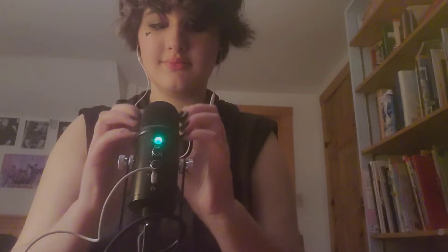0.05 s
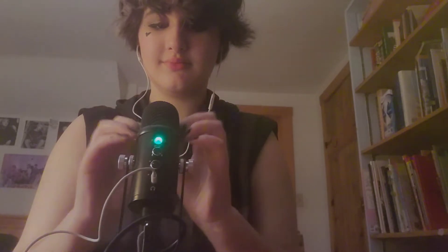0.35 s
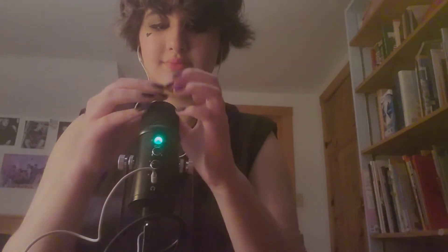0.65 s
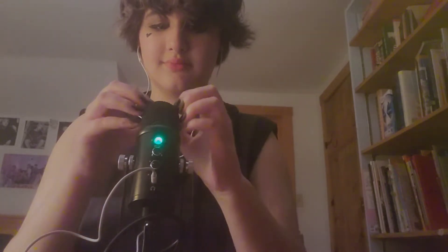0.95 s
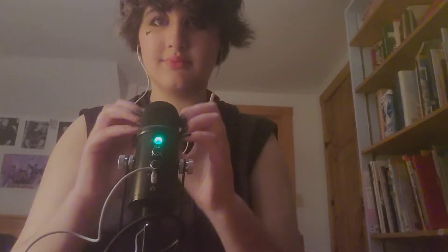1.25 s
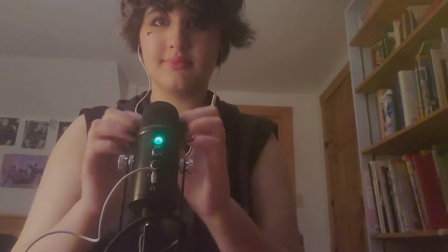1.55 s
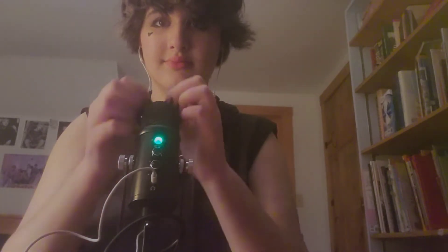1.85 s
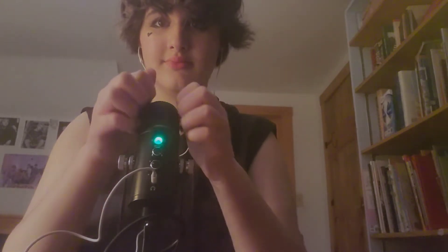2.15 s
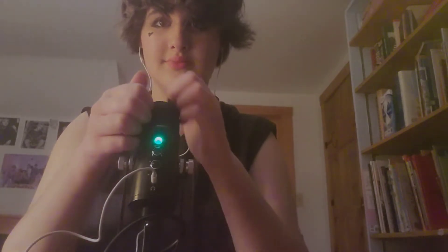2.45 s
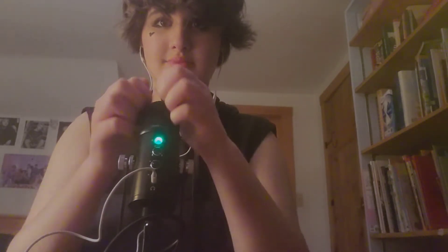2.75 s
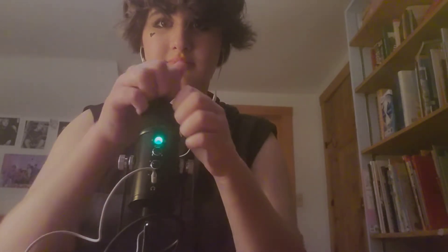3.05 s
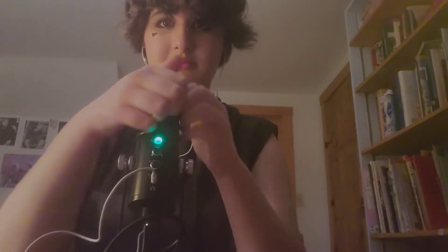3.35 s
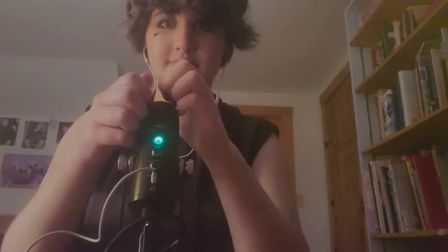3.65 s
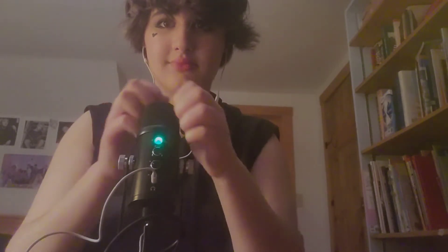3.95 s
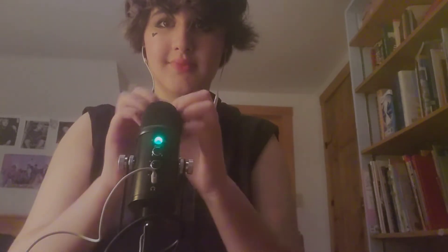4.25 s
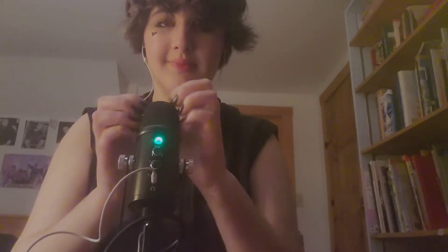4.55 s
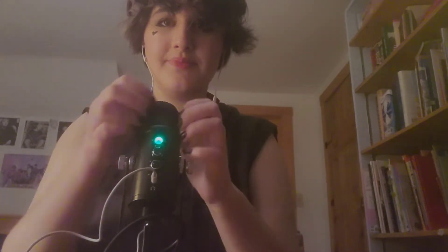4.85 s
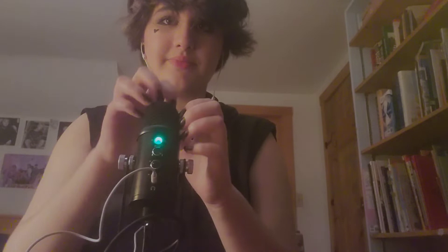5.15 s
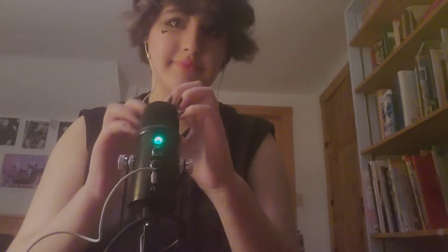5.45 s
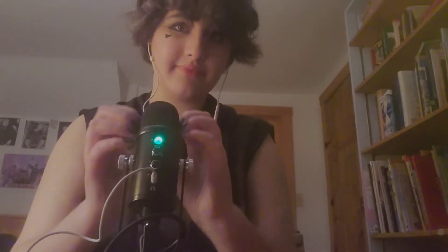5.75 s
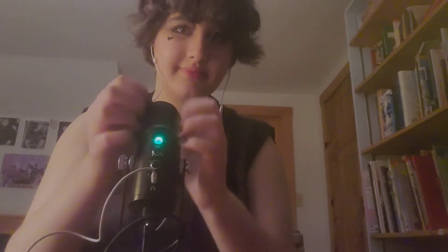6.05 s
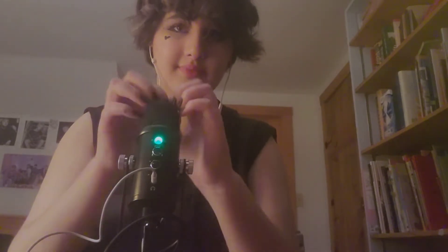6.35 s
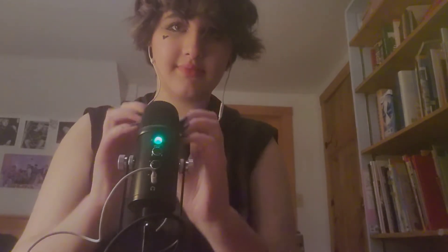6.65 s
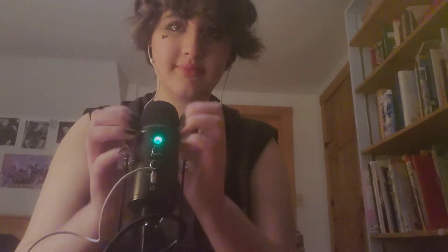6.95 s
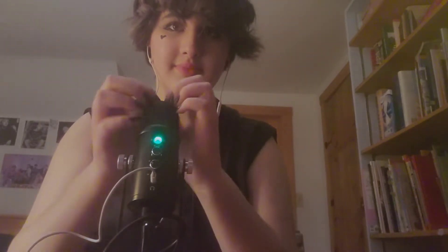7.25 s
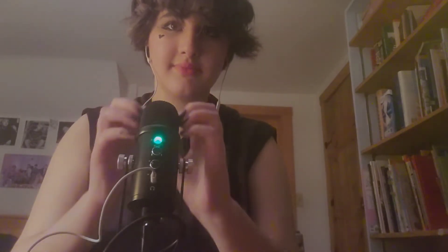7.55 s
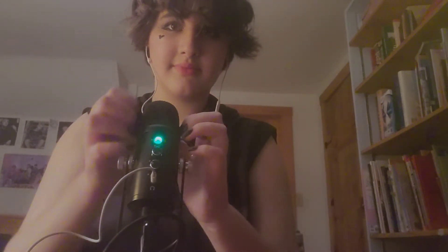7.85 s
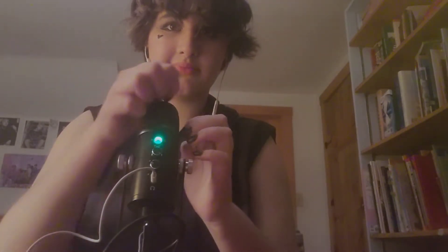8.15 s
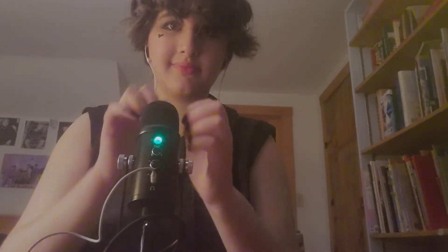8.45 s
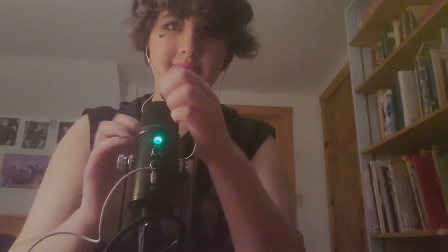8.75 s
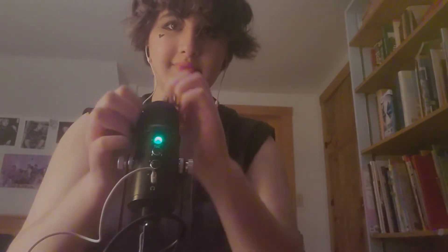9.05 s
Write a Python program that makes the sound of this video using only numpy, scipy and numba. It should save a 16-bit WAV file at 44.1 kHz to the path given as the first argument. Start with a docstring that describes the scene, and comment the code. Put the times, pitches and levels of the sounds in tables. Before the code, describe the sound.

Fingernails of two hands scratch and rub the foam cover of a microphone, right against the capsule. After one stroke and a brief pause, short uneven drags follow one another continuously, muffled and booming, with a fine crackle on top. Nails snag and spring free with bassy pops, fingertips thud on the cover, and small dry clacks come through from the grille. A very faint electronic hiss and whine lie underneath.

```python
"""Booming, crackling scratches: fingernails of two hands on the foam cover of a desk microphone.
Each nail sticks and slips over the pores; a slip shoves the microphone body, which booms, and
crackles through the grille. Single snags stand out, fingertips thud on the cover and nails clack
on the grille. The preamplifier faintly whines and hisses; a limiter holds the peaks."""
import sys
import numpy as np
from scipy import signal
from scipy.fft import rfft, irfft, next_fast_len
from scipy.io import wavfile
from scipy.ndimage import uniform_filter1d, minimum_filter1d
from numba import njit

SR = 44100
rng = np.random.default_rng(int(sys.argv[2]) if len(sys.argv) > 2 else 0)


def pcm_store(signal):
    """Save signal as 16-bit PCM."""
    levels = np.round(np.clip(np.atleast_2d(signal), -1, 1) * 32767)
    wavfile.write(sys.argv[1], SR, levels.astype(np.int16).T)


N = 410571
TIME = np.arange(N) / SR

# a nail snags and lets go: (time [s], spray [dB], shove on the body [dB])
SNAGS = [(0.0289, -10.5, 19), (0.0598, -26.5, 12), (0.0894, -30.5, 17), (0.1408, -33.5, 8),
         (0.2366, -21, 16), (0.2517, -23.5, 18), (0.3043, -28.5, 11), (0.8822, -39, 9), (1.0023, -47, 9.5),
         (1.041, -42, 3), (1.1361, -32, 18.5), (1.1595, -30.0, 20.5), (1.1806, -29.5, 18),
         (1.339, -26, 16.5), (1.3459, -16, 24.5), (1.6319, -33, 13.5), (2.6599, -31, 10),
         (2.7299, -46, 6.5), (3.04, -36, 5), (3.1149, -27, 18), (3.2582, -42, 10.5), (3.3487, -27.5, 10),
         (3.5886, -36, 21), (3.6221, -37, 16), (3.71, -27.5, 19.5), (3.7683, -44, 17), (4.0329, -44, 2),
         (4.338, -34.0, 9), (4.6178, -35, 7), (4.6892, -35, 9.5), (4.9625, -35.5, 0.5),
         (5.217, -33.5, 12.5), (5.3704, -22, 21.0), (5.3943, -17, 25), (5.4193, -23.5, 19.5),
         (5.5307, -31.5, 16), (5.5866, -26.5, 24), (5.6136, -32, 22.5), (5.7404, -25, 15.5),
         (5.7866, -24, 14), (5.8038, -35, 22), (5.9248, -19, 23), (5.9475, -18.5, 21), (6.1312, -34, 23),
         (6.19, -20.5, 22), (6.3623, -22, 23), (6.3871, -14.5, 23.5), (6.4491, -21.5, 14), (6.569, -27, 16),
         (6.7061, -25.5, 14), (6.737, -37, 22), (6.8696, -17, 27), (6.942, -42, 1), (6.9943, -29, 14.5),
         (7.1635, -31, 10), (7.219, -33.0, 21), (7.4036, -27.5, 13), (7.5159, -32.5, 18.0),
         (7.7467, -23.0, 19), (7.9241, -30.5, 13), (8.0232, -44, 14), (8.0463, -43.0, 14.0),
         (8.075, -32.5, 19.0), (8.1267, -32.5, 18), (8.195, -37, 15), (8.2254, -40, 15),
         (8.2391, -33.5, 17), (8.2896, -23.5, 21), (8.413, -32.5, 10), (8.844, -32, 9), (8.8802, -36, 15),
         (8.9161, -36.5, 15.0), (8.9492, -38, 15), (8.9712, -26, 25), (9.15, -28.5, 19.5),
         (9.2946, -39, 13.5)]
# what the foam passes of a soft press: (frequency [Hz], level [dB])
PRESS_EQ = [(15, -50.5), (27, -27), (38, -1.5), (70, -0.5), (140, -8), (220, -6), (400, -36), (1000, -71)]
# what it passes of a firm slip or a snag: (frequency [Hz], level [dB])
SNAP_EQ = [(30, -37), (80, -6), (130, 2), (280, 2.5), (450, -4), (520, 2.5), (620, -4), (720, -13.5),
           (830, -20.5), (1000, -38.5), (1400, -41), (3000, -63)]
# knock of a hard nail: (frequency [Hz], level [dB])
KNOCK_EQ = [(200, -23), (700, 13), (900, 8), (1150, 3.5), (1450, -9), (1900, -12.5), (4000, -16),
            (12000, -62)]
# resonances of microphone body and stand: (frequency [Hz], width [Hz], lift [dB])
BODY_MODES = [(40.7, 11, -6), (134.8, 16.2, 7), (172.4, 7, 2.5), (242.7, 28, -2), (331, 51, 8.5),
              (393.1, 29, 4.5), (571.6, 21.6, 7.5)]
# resonances of grille and capsule: (frequency [Hz], width [Hz], lift [dB])
GRILLE_MODES = [(1468, 30, 0.5), (1832, 59, 9), (2065, 176, 0), (2675, 170, 3.5), (3390, 76, 0.5),
                (3640, 99, -1), (4030, 390, -0.5), (4710, 140, -2.5), (5430, 80, -6), (5890, 185, 3.5),
                (6200, 110, -9.5), (6780, 130, -3), (7220, 190, -3.5), (8340, 41, -2), (9320, 146, 4.5),
                (12440, 230, 11), (13300, 170, 5), (14600, 120, 20)]


def undb(db):
    """Decibels to gain."""
    return np.exp(np.asarray(db) * np.log(10) / 20)


def response(eq, modes, size=16384):
    """Causal impulse response of unit energy: a broad EQ curve plus resonances."""
    hz = np.maximum(np.arange(size // 2 + 1) * SR / size, 1)
    eq_hz, eq_db = np.transpose(eq)
    cepstrum = irfft(np.log(undb(np.interp(np.log(hz), np.log(eq_hz), eq_db))))
    cepstrum[1:size // 2] *= 2  # fold to minimum phase
    cepstrum[size // 2 + 1:] = 0
    peaks = sum(undb(lift) / (1 + 1j * (hz - f * f / hz) / width) for f, width, lift in modes)
    ring = irfft(np.exp(rfft(cepstrum)) * (1 + peaks))
    return ring / np.linalg.norm(ring)


def through(x, ring):
    """Convolve with an impulse response."""
    return signal.oaconvolve(x, ring)[:N]


def pulses(times_s, sizes):
    """One impulse of each size at each time."""
    return np.bincount(np.clip(times_s * SR, 0, N).astype(int), sizes, N + 1)[:N]


def local_rms(x, span_s):
    """Running RMS over about span_s."""
    width = max(int(span_s * SR), 2)
    return np.sqrt(np.abs(uniform_filter1d(uniform_filter1d(x * x, width), width)) + 1e-12)


def driven(force, eq, modes, rms, span_s):
    """Resonator whose drive is scaled to give about the stated running RMS."""
    ring = response(eq, modes)
    return through(force * rms / local_rms(through(force, ring), span_s), ring)


def walk(per_s):
    """Random levels joined by straight lines."""
    knots_s = np.arange(0, N / SR + 1, 1 / per_s)
    return 1.63 * np.interp(TIME, knots_s, rng.standard_normal(len(knots_s)))


@njit
def moving_band(x, hz, width_hz):
    """Unity-gain state-variable band-pass with a moving centre."""
    y, band, low = np.empty(len(x)), 0., 0.
    for i in range(len(x)):
        g, damping = np.tan(np.pi * hz[i] / SR), width_hz / hz[i]
        v = (band + g * (x[i] - low)) / (1 + g * (g + damping))
        band, low = 2 * v - band, low + 2 * g * v
        y[i] = damping * v
    return y


def strokes():
    """Drags bite in, hold and ease off over resting fingers. Returns three gains, glide and hollow Hz."""
    # one drag of the nails: (start [s], length [s], bite-in [s], body boom [dB], pressure rumble [dB],
    # crackle [dB], glide smoothness [0-1], hollow resonance at start [Hz], at end [Hz])
    drags = [(0.0, 0.28, 0.0047, -10.5, -16.0, -40, 0.43, 377, 346),
             (0.739, 0.16, 0.029, -25.0, -22, -52.5, 0.02, 336, 353),
             (0.985, 0.13, 0.0038, -22.0, -31, -54, 0.14, 359, 351.0),
             (1.124, 0.15, 0.02, -12.5, -16.5, -41.5, 0.4, 380, 359),
             (1.297, 0.11, 0.032, -16.5, -17.5, -44, 0.28, 368, 369.0),
             (1.578, 0.18, 0.05, -14.0, -21, -41.5, 0.34, 381, 383),
             (1.873, 0.29, 0.1, -13.5, -16.5, -38, 0.3, 374, 360.5),
             (2.17, 0.13, 0.02, -23.5, -20.5, -48.0, 0.53, 358, 377.0),
             (2.298, 0.14, 0.032, -15.0, -23, -38, 0.82, 385.4, 377),
             (2.525, 0.22, 0.108, -15.0, -17.5, -38.5, 0.0, 373.7, 354),
             (2.763, 0.1, 0.044, -11.0, -13.0, -39, 0.32, 378.5, 334),
             (2.887, 0.14, 0.018, -24.5, -23, -47, 0.22, 336, 381),
             (3.072, 0.12, 0.058, -11.5, -18.5, -37, 0.14, 334.1, 333.2),
             (3.243, 0.031, 0.028, -17.5, -9.5, -41, 0.21, 370.0, 366.1),
             (3.323, 0.21, 0.028, -12.5, -10.5, -42, 0.21, 377, 348.0),
             (3.57, 0.17, 0.031, -11.0, -21, -39, 0.0, 341.2, 337.0),
             (3.745, 0.17, 0.028, -13.5, -17.5, -43.5, 0.03, 374.7, 359.8),
             (3.941, 0.22, 0.013, -18.0, -24.5, -47.5, 0.23, 360.7, 367.4),
             (4.185, 0.09, 0.03, -21, -36, -50, 0.16, 345.0, 382.0),
             (4.309, 0.21, 0.081, -10.5, -14.5, -35.5, 0.06, 378.1, 356.8),
             (4.548, 0.16, 0.021, -14.0, -14.5, -41.5, 0.37, 375.0, 376.0),
             (4.738, 0.095, 0.046, -18.5, -19, -46.5, 0.32, 354, 334.8),
             (4.882, 0.3, 0.021, -23.5, -22, -51, 0.0, 341, 354.2),
             (5.172, 0.17, 0.028, -15.5, -15.0, -44, 0.1, 364.1, 341.5),
             (5.326, 0.12, 0.027, -14.5, -12.5, -36, 0.15, 370.3, 355.5),
             (5.457, 0.099, 0.012, -16.5, -19.5, -45.5, 0.72, 405, 384),
             (5.585, 0.21, 0.015, -10.5, -14.5, -39, 0.26, 341.7, 350),
             (5.749, 0.24, 0.023, -10.5, -20.0, -36.0, 0.55, 357.2, 382.6),
             (5.997, 0.221, 0.02, -13.5, -16, -43, 0.39, 367, 343.2),
             (6.315, 0.14, 0.059, -9.5, -14.5, -36, 0.14, 345.4, 379.3),
             (6.489, 0.18, 0.029, -11.5, -17.5, -38.5, 0.57, 362.8, 382),
             (6.693, 0.28, 0.027, -11.5, -19.5, -35.5, 0.19, 389.7, 337),
             (7.104, 0.14, 0.0064, -20, -18.5, -55.5, 0.12, 387, 360.5),
             (7.313, 0.19, 0.086, -9.5, -17.5, -37.0, 0.19, 362.7, 386.0),
             (7.552, 0.098, 0.013, -14.0, -17.5, -39, 0.07, 379, 390.4),
             (7.687, 0.053, 0.047, -15.0, -15.5, -38.0, 0.26, 353.8, 354.6),
             (7.813, 0.18, 0.12, -12.0, -18.5, -36.5, 0.5, 367.7, 345),
             (8.0, 0.16, 0.03, -11.5, -17, -45, 0.0, 349.5, 362.7),
             (8.186, 0.13, 0.032, -17.5, -18.5, -46.5, 0.0, 342.9, 338.3),
             (8.525, 0.22, 0.06, -16, -17.5, -41.5, 0.38, 390.1, 379.7),
             (8.796, 0.13, 0.041, -18.5, -19, -47, 0.13, 359.6, 333.7),
             (8.937, 0.15, 0.046, -12.0, -16.5, -38.5, 0.0, 338.8, 373.7),
             (9.118, 0.19, 0.02, -10.5, -17.0, -40, 0.0, 373.5, 355)]
    # resting fingers stir the foam; both hands lift off once, early: (time [s], boom [dB])
    rest = [(0, -25), (.36, -29), (.42, -70), (.6, -80), (.66, -50.5), (.8, -34), (1.5, -37), (1.85, -31),
            (2.5, -35), (3.05, -25), (4.3, -26), (4.88, -36), (5.5, -36), (6.3, -23), (7.07, -26),
            (7.8, -25.5), (8.48, -29.5), (9.3, -25)]
    release_db_per_s, release_db_per_s2 = 170, 1400
    boom = undb(np.interp(TIME, *np.transpose(rest))) ** 2  # layers add as powers
    rumble, crackle = boom * undb(-2.5) ** 2, boom * undb(-23.5) ** 2
    glide_sum, hz_sum = boom * 0.2, boom * 378.6  # weighted by boom power
    for start_s, length_s, bite_s, boom_db, rumble_db, crackle_db, glide, from_hz, to_hz in drags:
        span = slice(int(start_s * SR), int((start_s + length_s + 0.25) * SR))
        age_s = TIME[span] - start_s
        after_s = np.maximum(age_s - length_s, 0)
        fade = undb(-release_db_per_s * after_s - release_db_per_s2 * after_s ** 2)
        envelope = np.clip(age_s / bite_s, 0, 1) * fade
        power = (envelope * undb(boom_db)) ** 2
        boom[span] += power
        rumble[span] += (envelope * undb(rumble_db)) ** 2
        crackle[span] += (envelope * undb(crackle_db)) ** 2
        glide_sum[span] += power * glide
        slide = np.sin(np.pi / 2 * np.clip(age_s / length_s, 0, 1)) ** 2
        hz_sum[span] += power * (from_hz + (to_hz - from_hz) * slide)
    tremor = undb(1.24 * walk(per_s=28))  # unsteady finger pressure
    gains = [np.sqrt(power) * tremor for power in (boom, rumble, crackle)]
    return *gains, np.clip(glide_sum / boom, 0, 1), hz_sum / boom


def stuck(hold_s, dip_db):
    """Gain dip as the nail stands still just before a snag."""
    times_s = np.transpose(SNAGS)[0]
    upcoming = np.minimum(np.searchsorted(times_s, TIME), len(times_s) - 1)
    wait_s = times_s[upcoming] - TIME
    return undb(dip_db * np.exp(-(wait_s / hold_s) ** 2) * (wait_s >= 0))


def slips(per_s, spread_db, count=5000):
    """Stick-slip pulses: uneven waits around a moving rate, uneven sizes."""
    travel = np.cumsum(per_s) / SR
    catches = np.cumsum(rng.gamma(3, 1 / 3, count))
    sizes = undb(spread_db * rng.standard_normal(count))
    return pulses(np.interp(catches, travel, TIME), sizes * (catches < travel[-1]))


def burst(rise_s, decay_s, size=4096):
    """Envelope of the pores flicking back after one slip."""
    t = np.arange(size) / SR
    envelope = (1 - np.exp(-t / rise_s)) * np.exp(-t / decay_s)
    return envelope / envelope.max()


def pores(spread_db):
    """Dense, unequal clicks from the foam's cell walls."""
    clicks = rng.standard_normal(N) * undb(spread_db * rng.standard_normal(N))
    return clicks / clicks.std()


def scratching(boom_gain, rumble_gain, crackle_gain, glide, hollow_hz):
    """Slips shove the body and set off crackle; a gliding nail slips faster, humming and rasping."""
    # what the foam passes of a light slip: (frequency [Hz], level [dB])
    light_eq = [(30, -35), (80, -13), (130, 2), (280, 1.5), (450, -8.5), (520, -2), (620, -10.5),
                (720, -27), (820, -47), (1000, -56), (1400, -50.5), (3000, -92)]
    # hollow under the foam: (frequency [Hz], level [dB])
    hollow_eq = [(150, -34.5), (290, -13.5), (338, -0.5), (380, -0.5), (402, -2), (440, -15.5), (600, -30),
                 (1000, -46.5), (3000, -79)]
    # crackle of the pores: (frequency [Hz], level [dB])
    crackle_eq = [(300, 0.5), (900, 9), (1500, -2.5), (2200, -1), (4000, -3), (5000, -6.5), (7000, -4),
                  (8500, -9), (11000, -11.5), (13000, -14), (14000, -16), (15500, -33)]
    # rasp of a gliding nail: (frequency [Hz], level [dB])
    rasp_eq = [(600, 14.5), (1500, -2.5), (2600, -12), (3100, -2), (3480, 12), (3750, -3), (4000, 5),
               (4800, -22.5), (5800, -37), (6800, -16), (8500, -12), (15500, -44)]
    firm_from_db, firm_range_db = -25, 16.5
    moving = stuck(hold_s=0.029, dip_db=-3.0)
    push, scrape = moving * boom_gain, moving * crackle_gain
    release = slips(per_s=120 + 80 * glide, spread_db=6.0)
    shove = release + undb(-28.5) * rng.standard_normal(N)
    shove += undb(1 + 11 * glide) * moving_band(shove, hollow_hz, width_hz=21.2)
    # firm pressure flattens the foam, passing more midrange
    firm = np.clip((20 * np.log10(boom_gain) - firm_from_db) / firm_range_db, 0, 1)
    light = driven(shove, light_eq, BODY_MODES, push * np.sqrt((1 - glide) * (1 - firm)), span_s=0.019)
    heavy = driven(shove, SNAP_EQ, BODY_MODES, push * np.sqrt((1 - glide) * firm), span_s=0.042)
    hum = driven(shove, hollow_eq, BODY_MODES, push * np.sqrt(glide) * undb(0.96), span_s=0.028)
    press = release + undb(-19) * rng.standard_normal(N)
    rumble = driven(press, PRESS_EQ, BODY_MODES, rumble_gain, span_s=0.042)
    flicks = through(release, burst(rise_s=0.0021, decay_s=0.0014))
    sliding = undb(-7.0) * local_rms(flicks, span_s=0.1)  # fine hiss between slips
    grit = (flicks + sliding) * pores(spread_db=5.0)
    singing = glide ** 4  # only a very smooth glide makes the nail sing
    crackle = driven(grit, crackle_eq, GRILLE_MODES, scrape * np.sqrt(1 - singing), span_s=0.029)
    rasp = driven(grit, rasp_eq, GRILLE_MODES, scrape * np.sqrt(singing), span_s=0.04)
    catching = (1 - glide) ** 4
    crunch = driven(release, KNOCK_EQ, GRILLE_MODES, push * catching * undb(-28.5), span_s=0.044)
    return light + heavy + hum + rumble + crunch, crackle + rasp


def wander(x, depth_db, per_s, count=11):
    """The contact point moves over the cover, so each treble band swells and fades alone."""
    size = 2 * next_fast_len(N // 2 + 1, real=True)
    hz = np.linspace(1, SR / 2, size // 2 + 1)
    band_index = np.interp(np.log(hz), np.log([800, 15000]), [0, count - 1])
    spectrum = rfft(x, size)
    windows = (np.maximum(1 - np.abs(band_index - k), 0) for k in range(count))
    bands = (irfft(spectrum * window, size)[:N] for window in windows)
    return sum(band * undb(depth_db * walk(per_s)) for band in bands)


def preamplifier():
    """Faint, steady whine and hiss of the electronics."""
    # whine: (frequency [Hz], RMS level [dB])
    tones = [(1000, -80.5), (2000, -82.5), (3000, -86.5)]
    # hiss: (frequency [Hz], level [dB])
    hiss_eq = [(100, 10), (1000, -11), (4000, -2), (15000, -19.5)]
    whine = sum(np.sqrt(2) * undb(db) * np.sin(2 * np.pi * hz * TIME) for hz, db in tones)
    return whine + undb(-76.5) * through(rng.standard_normal(N), response(hiss_eq, []))


def snags():
    """A caught nail springs free: one hard shove and a bright spray of crackle."""
    # spray: (frequency [Hz], level [dB])
    spray_eq = [(300, -3), (900, 6), (1500, -4.5), (2200, -3.5), (4000, -4), (5000, -6), (7000, -2),
                (8500, -10.5), (11000, -13), (13000, -13.5), (14000, -21), (15500, -38)]
    times_s, spray_db, shove_db = np.transpose(SNAGS)
    boom = through(pulses(times_s, -undb(shove_db)), response(SNAP_EQ, BODY_MODES))
    flicks = through(pulses(times_s, undb(spray_db)), burst(rise_s=0.00063, decay_s=0.0026))
    return boom + through(flicks * pores(spread_db=4), response(spray_eq, GRILLE_MODES))


def bumps():
    """Fingertips thud, deeper the longer the contact; the stand rings and the microphone sways."""
    # a fingertip lands or lifts off: (time [s], thud [dB], contact [s], stand ring [dB])
    touches = [(0.346, -4, 0.0092, -21), (0.62, -6, 0.0077, -57), (0.755, 21, 0.01, -24),
               (1.441, -10, 0.0093, -33), (2.19, 30, 0.03, -47), (2.238, 33, .022, -45),
               (3.499, 0, 0.0063, -34)]
    stand, sway = (174.4, 0.25, 0), (42, 1.2, -22)  # (frequency [Hz], T60 [s], level [dB])
    force, ring = np.zeros(N), np.zeros(N)
    for start_s, thud_db, contact_s, ring_db in touches:
        age_s = np.maximum(TIME - start_s, 0)
        contact = np.sin(np.pi * np.minimum(age_s / contact_s, 1)) ** 2
        force += undb(thud_db) * contact * 2 / (contact_s * SR)
        for hz, t60_s, mode_db in stand, sway:
            ring += undb(ring_db + mode_db - 60 * age_s / t60_s) * np.sin(2 * np.pi * hz * age_s)
    return through(force, response(PRESS_EQ, BODY_MODES)) + ring


def knocks():
    """Dry clacks of a nail striking through to the grille."""
    # nail strikes: (time [s], level [dB])
    strikes = [(0.883, -14), (1, -15), (1.039, -15), (1.136, -7), (1.19, -7), (1.338, -3), (1.977, -9),
               (3.117, -3), (3.766, -10), (5.37, 1), (5.949, -1), (6.447, -1), (6.943, -4), (6.994, -2.5),
               (7.404, -2), (7.44, -5), (8.099, 1.5), (9.293, -7)]
    times_s, level_db = np.transpose(strikes)
    return through(pulses(times_s, -undb(level_db)), response(KNOCK_EQ, GRILLE_MODES))


def scene():
    """Mono sum of all sources."""
    body, crackle = scratching(*strokes())
    treble = wander(crackle, depth_db=2.0, per_s=16)
    return (body + treble + snags() + knocks() + bumps() + preamplifier())[None]


def record(dry):
    """Capsule bass roll-off, look-ahead limiter at full scale, treble cut."""
    low_hz, top_hz, hold_s = 32, 15500, 0.003
    sound = signal.sosfilt(signal.butter(6, low_hz, "high", fs=SR, output="sos"), dry)
    hold = int(hold_s * SR)
    max_gain = 1 / np.maximum(np.abs(sound), 1)
    gain = uniform_filter1d(minimum_filter1d(max_gain, 2 * hold + 1), hold)
    return signal.sosfilt(signal.ellip(8, 0.2, 70, top_hz, fs=SR, output="sos"), sound * gain)


dry = scene()
out = record(dry)
pcm_store(out)
```